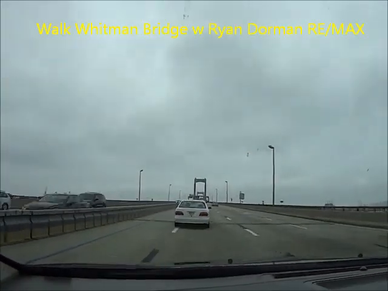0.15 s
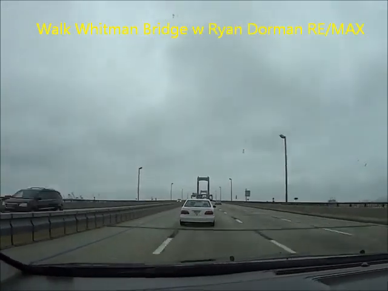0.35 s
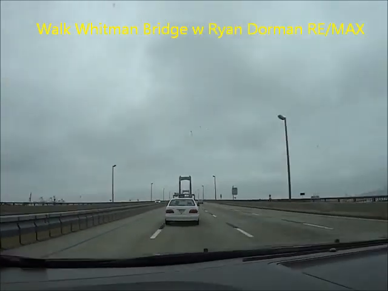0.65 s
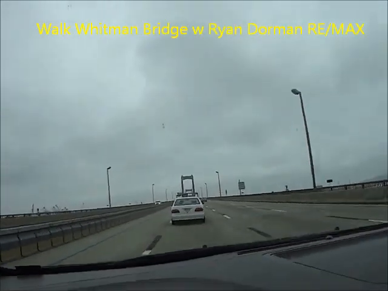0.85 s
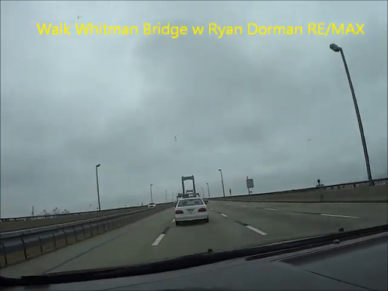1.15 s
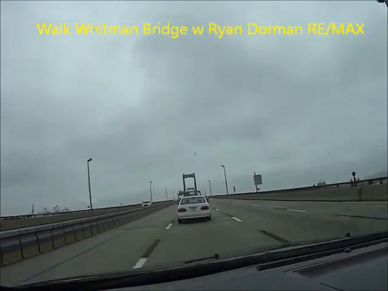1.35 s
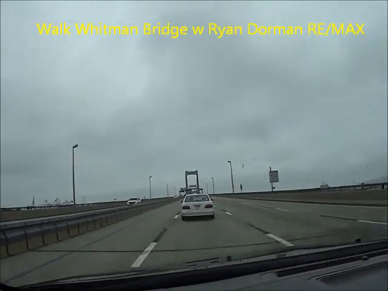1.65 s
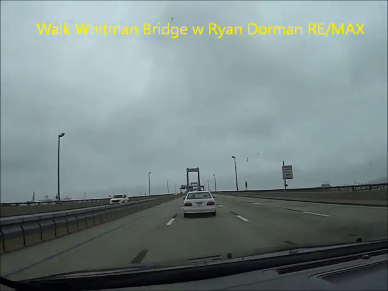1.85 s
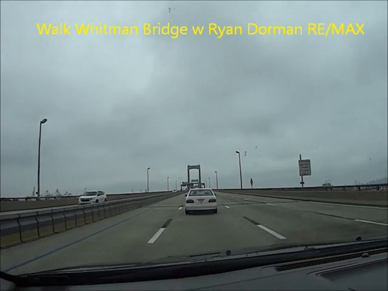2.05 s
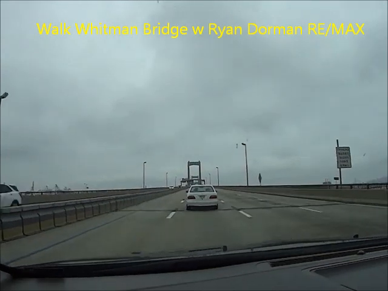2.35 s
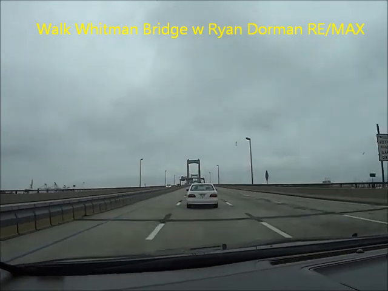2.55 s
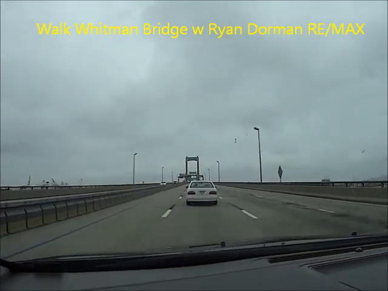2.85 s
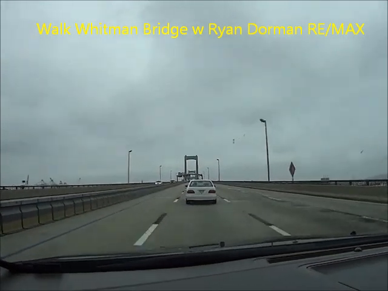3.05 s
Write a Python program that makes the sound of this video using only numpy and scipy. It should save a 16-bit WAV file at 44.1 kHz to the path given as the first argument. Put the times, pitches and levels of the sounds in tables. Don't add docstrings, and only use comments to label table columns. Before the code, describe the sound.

Inside a car driving over concrete, deep road rumble and engine hum continue while axles thump across joints near one, two and three seconds, each jolt shaking keys and loose trim; small stereo microphone in the cabin.

```python
import sys
import numpy as np
from scipy import signal
from scipy.fft import rfft, irfft
from scipy.io import wavfile
from scipy.ndimage import uniform_filter1d

SR = 44100
rng = np.random.default_rng(int(sys.argv[2]) if len(sys.argv) > 2 else 0)


def to_linear_factor(level_db):
    exponent = np.asarray(level_db, float) / 20
    return 10 ** exponent


def output_pcm(signal):
    pcm = np.clip(np.atleast_2d(signal).T, -1, 1) * 32767
    wavfile.write(sys.argv[1], SR, np.round(pcm).astype(np.int16))


N = 140679

# start_s [s], level_db [dB]
ROAD_ROUGHNESS = [(0.0, -26.5), (0.26, -30.5), (0.67, -29.5), (0.7, -37), (1.03, -28), (1.19, -29.5),
                  (1.31, -31), (1.39, -32), (1.67, -31.5), (1.71, -28), (1.76, -36), (2.11, -17.5),
                  (2.45, -29), (3.11, -27), (3.14, -18.5), (3.19, -21)]
# pitch_hz [Hz], level_db [dB per Hz]
RUMBLE_COLOUR = [(8.8, -39), (15, -7), (87, -2), (133, -2), (166, -3.5), (227, -3), (330, -14),
                 (430, -28.5), (730, -120)]
ROAR_COLOUR = [(150, -54.5), (250, -9), (327, -10.5), (393, -2), (602, -11.5), (890, -7.5), (1020, -14),
               (1290, -12.5), (2000, -30.5), (2600, -69), (4400, -120)]
WIND_COLOUR = [(900, -16), (1500, -8.5), (2000, -6.5), (2700, -13.5), (4070, -22), (5500, -28), (8000, -34),
               (11000, -35.5)]
HISS_COLOUR = [(2000, -30), (5000, -1), (8000, 0), (11000, -1.5)]
# pitch_hz [Hz], width_hz [Hz], level_db [dB]
PANEL_MODES = [(56.7, 4.4, -38.5), (125, 21.4, -30.5), (190, 35, -35), (240.8, 51, -33.5),
               (390.8, 50, -36.5), (457.2, 5.9, -39.5), (770.4, 40, -42.5), (920, 80, -46)]
# start_s [s], pitch_hz [Hz], level_db [dB]
ENGINE_HUM = [(0.0, 85.82, -25.5), (.45, 90.05, -25), (.63, 90.93, -17), (0.76, 94.45, -21.5),
              (0.99, 83.28, -20.5), (1.11, 94.15, -23.5), (1.19, 87.76, -34), (1.4, 95.36, -30),
              (1.72, 90.76, -18.5), (2.16, 90.32, -23), (2.37, 85.38, -22.5), (2.91, 85.9, -24),
              (3.11, 83.1, -18.5), (3.19, 77.6, -20)]
# start_s [s], length_s [s], ring level_db [dB], dry rattle level_db [dB]
KEY_SWINGS = [
    (-.05, 0.34, -66, -60.5),
    (0.87, 0.045, -72, -64),
    (0.93, 0.074, -77, -61),
    (1.042, .075, -78, -60),
    (1.25, 0.074, -69, -77),
    (2.005, 0.16, -61, -56),
    (2.168, 0.16, -71, -68),
    (2.962, 0.019, -68, -62),
    (3.001, 0.17, -67, -64),
]
# pitch_hz [Hz], level_db [dB], t60_s [s]
KEY_MODES = [(5300, -6, 0.05), (5200, -5, 0.05), (6140, -3, .03), (7320, -5, 0.055), (8640, -11, 0.04),
             (8700, -11, 0.03), (9770, -2.5, .05), (9900, -2, .05), (4900, -13, .05), (10600, -4, .06),
             (10780, -4, .04), (10400, -8, 0.04)]
# start_s [s], pitch_hz [Hz], level_db [dB]
CLEAR_CLINKS = [(.003, 9770, -49), (.04, 5290, -56), (.062, 5290, -50), (.127, 10800, -52),
                (.127, 5290, -51), (.21, 5290, -50), (.872, 5290, -51), (.888, 9800, -50),
                (.888, 8600, -54), (.893, 10800, -52), (1.077, 8500, -43), (1.981, 6140, -50),
                (2.01, 9770, -52), (2.01, 10800, -46), (2.017, 6140, -52), (2.03, 9770, -50),
                (2.05, 5280, -45), (2.05, 10800, -46), (2.069, 10600, -49), (2.087, 7320, -52),
                (2.1, 9770, -54), (2.109, 6140, -53), (2.12, 10800, -50), (2.16, 6140, -52),
                (2.19, 5280, -52), (2.208, 9770, -56), (2.23, 9770, -54), (2.232, 5280, -55),
                (2.29, 5280, -56), (2.244, 8600, -55), (2.283, 10700, -55), (2.286, 9770, -56),
                (3.005, 9770, -52), (3.01, 8600, -54), (3.033, 9770, -54), (3.068, 10700, -51),
                (3.068, 6000, -54), (3.087, 9770, -55), (3.112, 9900, -54)]
# pitch_hz [Hz], t60_s [s]
CLINK_DECAY = [(5300, .1), (6140, .035), (7300, .06), (8600, 0.049), (9800, 0.073), (10800, 0.066)]
# pitch_hz [Hz], level_db [dB per Hz]
CRACKLE_COLOUR = [(1200, -20), (2500, 2), (4000, 0), (6500, -0.5), (9000, -6), (11000, -8)]
# start_s [s], peak level_db [dB], tail t60_s [s], brightness [dB per octave]
TRIM_TICKS = [(.041, -48, 0.027, 2), (.062, -43, .03, 0.), (.080, -50, .03, 3), (0.126, -45, .03, -3),
              (0.135, -42, .03, 0), (.1835, -47, .03, 0.), (.2, -46, .03, 4), (0.8965, -39.5, 0.045, 2.),
              (0.9393, -40, 0.03, -4), (0.9587, -32.5, 0.053, -1.5), (1.0397, -42, 0.1, -.5),
              (1.0707, -28, 0.05, -1), (1.0738, -32, 0.054, 2), (1.087, -45, 0.055, 0.), (1.1, -46, .05, 3),
              (1.9808, -40, 0.032, -2), (2, -32, 0.035, -1.5), (2.018, -44, 0.035, 1),
              (2.035, -42, 0.038, 1), (2.051, -36, 0.038, -4), (2.064, -41, .035, -2.),
              (2.073, -41, .035, -1.), (2.091, -43, .035, -1.), (2.109, -43, 0.035, 1),
              (2.128, -48, .035, -1.), (2.16, -39, .035, -4), (2.179, -44, .035, -1.),
              (2.213, -45, .03, 0.), (2.233, -45, .03, 0.), (2.25, -47, .03, 0.), (2.967, -37, 0.064, 1.),
              (3.055, -32, 0.048, -6), (3.1192, -38.5, 0.04, 1.5), (3.1583, -42, 0.04, 0.),
              (3.177, -49, .03, -6)]
# pitch_hz [Hz], level_db [dB per Hz]
TRIM_COLOUR = [(880, -27), (1500, -2.5), (1630, -4), (2620, -2), (3780, -12), (5970, -4.5), (7120, -11.5),
               (8620, -6.5), (11000, -11), (14300, -33.5), (22000, -120)]
# start_s [s], peak level_db [dB], pitch_hz [Hz], t60_s [s]
JOINT_THUMPS = [(.09, -17.5, 55, 0.11), (.495, -12, 125, 0.074), (0.883, -5, 112, 0.055),
                (.882, -11.5, 230, 0.028), (0.8798, -23, 1125, 0.037), (0.912, -16.5, 80.4, 0.13),
                (0.961, -15.5, 125, 0.11), (0.979, -15.5, 76, .1), (0.931, -16, 85, 0.11),
                (.993, -14, 131, 0.076), (1.008, -7, 60.6, 0.086), (1.008, -14, 136, 0.07),
                (1.699, -17, 85.6, 0.093), (1.934, -13, 390, 0.13), (1.972, -15, 85, .1),
                (1.936, -14, 273, 0.07), (2.055, -23, 231, .1), (2.2, -18.5, 215, 0.11),
                (1.942, -13.5, 123.7, 0.16), (2.001, -20, 86.3, 0.14), (2.092, -13, 60, 0.16),
                (2.1, -14.5, 199, 0.11), (2.385, -10.5, 190, 0.062), (2.994, -21, 520, .06),
                (3.002, -12, 118, 0.08), (3.069, -13, 100, .08), (2.999, -14.5, 59.6, 0.073),
                (3.118, -7.5, 129, 0.058), (3.126, -9.5, 38.4, 0.12)]
# start_s [s], pitch_hz [Hz], level_db [dB]
TREAD_WHINE = [
    (2.3, 2480, -68),
    (2.49, 2490, -56),
    (2.65, 2510, -56),
    (2.72, 2500, -64),
    (2.85, 2490, -67),
    (2.97, 2490, -57),
    (3.1, 2500, -64),
]
# pitch_hz [Hz], share [0-1]
PORT_LIKENESS = [(30, .96), (125, .98), (250, .96), (500, .88), (1000, .68), (2000, .4), (4000, .36),
                 (8000, .55)]
# pitch_hz [Hz], lead [radians]
PORT_LEAD = [(25, -.4), (60, -.5), (130, -.9), (260, -1.3), (600, -1.55), (1100, -1.25), (2000, -1.6),
             (4500, -.35), (9000, -.02)]
# pitch_hz [Hz], level_db [dB]
PORT_TILT = [(60, 6.5), (170, 5), (470, 1), (1330, -0.5), (3740, 1), (10500, -0.5)]


def evened(x):
    return x / np.sqrt(np.mean(x ** 2) + 1e-20)


def read(points, hz):
    f, value = np.transpose(points)
    return np.interp(np.log(hz + 1), np.log(f + 1), value)


def add(mix, start_s, sound):
    part = mix[round(start_s * SR):][:len(sound)]
    part += sound[:len(part)]


def shaped(x, colour):
    size = x.shape[-1]
    gain = to_linear_factor(read(colour, np.fft.rfftfreq(size, 1 / SR)))
    return irfft(rfft(x) * gain, size)


def rough(share):
    start_s, level_db = np.transpose(ROAD_ROUGHNESS)
    swell_db = np.interp(np.arange(N) / SR, start_s, level_db) - level_db.mean()
    return to_linear_factor(share * uniform_filter1d(swell_db, size=4000))


def noise(colour, patchy_db, size):
    frames, hz = 4 * N // size + 5, np.fft.rfftfreq(size, 1 / SR)
    a, b, c, d, patches = rng.standard_normal((frames, len(hz), 5)).T
    patches = uniform_filter1d(patches, size=12, axis=0)
    patches = evened(uniform_filter1d(patches, size=10, axis=1))
    gain = to_linear_factor(read(colour, hz)[:, None] + patchy_db * patches)
    bins = np.array([a + 1j * b, c + 1j * d]) * gain
    sound = signal.istft(bins, nperseg=size, noverlap=size - size // 4)[1]
    return evened(sound[:, :N])


def road():
    rumble = to_linear_factor(-21.5) * rough(0.31) * noise(RUMBLE_COLOUR, patchy_db=1.0, size=4096)
    roar = to_linear_factor(-27.5) * rough(0.085) * noise(ROAR_COLOUR, patchy_db=1.0, size=2048)
    wind = to_linear_factor(-41) * rough(0.26) * noise(WIND_COLOUR, patchy_db=0.88, size=1024)
    hiss = to_linear_factor(-60) * noise(HISS_COLOUR, patchy_db=4.5, size=1024)
    return rumble + roar + wind + hiss


def body():
    out, t = np.zeros((2, N)), np.arange(N) / SR
    for pitch_hz, width_hz, level_db in PANEL_MODES:
        pole = np.exp(-np.pi * width_hz / SR)
        slow = rng.standard_normal((2, N)) + 1j * rng.standard_normal((2, N))
        slow = signal.lfilter([1], np.convolve([1, -pole], [1, -pole]), slow)
        out += to_linear_factor(level_db) * evened((slow * np.exp(2j * np.pi * pitch_hz * t)).real)
    return out * rough(0.39)


def engine():
    wobble_share, trim_db = 0.0354, -3.5
    start_s, pitch_hz, level_db = np.transpose(ENGINE_HUM)
    t = np.arange(N) / SR
    wobble = evened(uniform_filter1d(rng.standard_normal(N), size=3000))
    hz = np.interp(t, start_s, pitch_hz) * (1 + wobble_share * wobble)
    turns = np.cumsum(hz) / SR
    return np.sqrt(2) * to_linear_factor(np.interp(t, start_s, level_db) + trim_db) * np.sin(2 * np.pi * turns)


def taps(per_s, column, spread_db):
    fade_db = -4.5
    t, swing = np.arange(N) / SR, np.zeros(N)
    for row in KEY_SWINGS:
        start_s, length_s = row[:2]
        during = (t > start_s) * (t < start_s + length_s)
        swing += to_linear_factor(row[column] + fade_db * (t - start_s) / length_s) * during
    hits = rng.random(N) < per_s / SR
    return swing * hits * to_linear_factor(spread_db * np.minimum(rng.exponential(1, N), 3))


def keys():
    clinks_per_s, rattles_per_s, rattle_t60_s = 670, 505, 0.015
    t, out = np.arange(6000) / SR, np.zeros(N)
    onset = np.minimum(t / .002, 1)
    for pitch_hz, level_db, t60_s in KEY_MODES:
        tone = to_linear_factor(level_db - 60 * t / t60_s) * np.sin(2 * np.pi * pitch_hz * t) * onset
        hits = taps(clinks_per_s / 3, column=2, spread_db=6.0) * rng.choice([-1, 1], N)
        out += signal.oaconvolve(hits, tone)[:N]
    for start_s, pitch_hz, level_db in CLEAR_CLINKS:
        decay = to_linear_factor(level_db - 60 * t / read(CLINK_DECAY, pitch_hz))
        add(out, start_s, decay * np.sin(2 * np.pi * pitch_hz * t) * onset)
    crackle = uniform_filter1d(taps(rattles_per_s, column=3, spread_db=5.0), size=60) * 60
    crackle = signal.lfilter([1], [1, -to_linear_factor(-60 / (rattle_t60_s * SR))], crackle) / 60
    return out + crackle * evened(shaped(rng.standard_normal(N), CRACKLE_COLOUR))


def trim():
    rise_s, crack_t60_s, scatter_db = .001, .012, 2
    out, t = np.zeros((2, N)), np.arange(6000) / SR
    bursts = rng.standard_normal((len(TRIM_TICKS), 2, 6000))
    for (start_s, level_db, t60_s, bright_db), burst in zip(TRIM_TICKS, bursts):
        crack = to_linear_factor(-60 * t / crack_t60_s)
        tail = to_linear_factor(scatter_db - 60 * t / t60_s)
        shape = np.minimum(t / rise_s, 1) * (crack + tail)
        colour = [(hz, db + bright_db * np.log2(hz / 6000)) for hz, db in TRIM_COLOUR]
        for side in range(2):
            add(out[side], start_s, to_linear_factor(level_db - 5) * shape * evened(shaped(burst[side], colour)))
    return out


def joints():
    rise_s, sag_share, sag_s = 0.0042, 0.48, 0.0056
    out, t = np.zeros(N), np.arange(SR // 3) / SR
    bent = t + sag_share * sag_s * (1 - np.exp(-t / sag_s))
    push = 1 - np.exp(-t / rise_s)
    for start_s, level_db, pitch_hz, t60_s in JOINT_THUMPS:
        decay = to_linear_factor(level_db + 6.5 - 60 * t / t60_s)
        add(out, start_s, push * decay * np.sin(2 * np.pi * pitch_hz * bent))
    return out


def whine():
    width_hz = 25
    start_s, pitch_hz, level_db = np.transpose(TREAD_WHINE)
    t, pole = np.arange(N) / SR, np.exp(-np.pi * width_hz / SR)
    slow = signal.lfilter([1], [1, -pole], rng.standard_normal(N) + 1j * rng.standard_normal(N))
    turns = np.cumsum(np.interp(t, start_s, pitch_hz)) / SR
    tone = evened((slow * np.exp(2j * np.pi * turns)).real)
    return to_linear_factor(np.interp(t, start_s, level_db)) * tone


def scene():
    field = road() + body() + trim()
    near = engine() + joints() + keys() + whine()
    hz = np.fft.rfftfreq(N, 1 / SR)
    same = np.clip(read(PORT_LIKENESS, hz), 0, 1)
    tilt = to_linear_factor(read(PORT_TILT, hz) / 2)
    shared, unrelated, direct = rfft(field[0]), rfft(field[1]), rfft(near)
    left = shared + direct
    right = (same * shared + direct) * np.exp(-1j * read(PORT_LEAD, hz))
    right = right + np.sqrt(1 - same ** 2) * unrelated
    return irfft(np.array([left * tilt, right / tilt]), N)


def top_cut(x):
    return signal.sosfilt(signal.butter(12, 11120, fs=SR, output="sos"), x)


def record(dry):
    ceiling, edge_hz = .9, 11130
    held = dry / (1 + (abs(dry) / ceiling) ** 6) ** (1 / 6)
    lowpass = signal.firwin(511, edge_hz, window=("kaiser", 9), fs=SR)
    mix = signal.oaconvolve(held, lowpass[None], "same")
    return top_cut(mix)


dry = scene()
out = record(dry)
output_pcm(out)
```